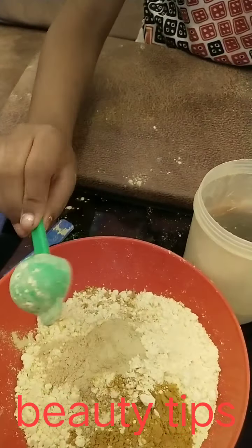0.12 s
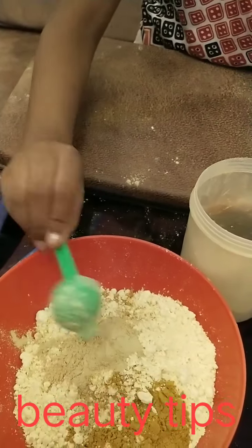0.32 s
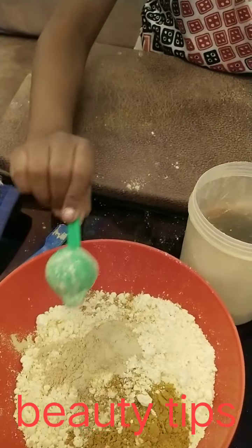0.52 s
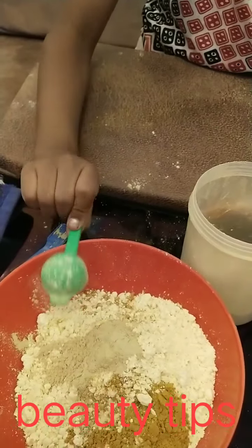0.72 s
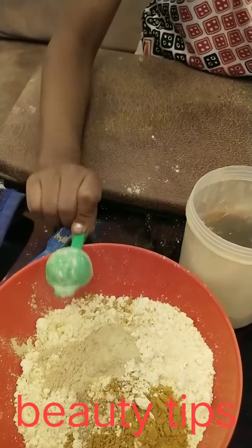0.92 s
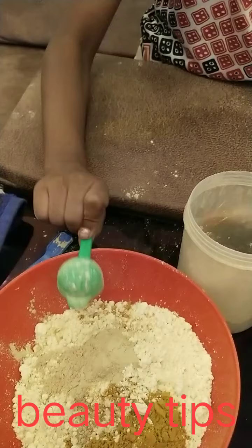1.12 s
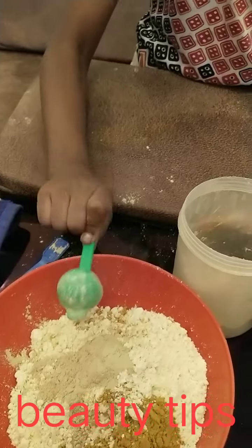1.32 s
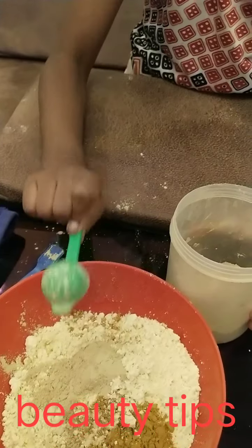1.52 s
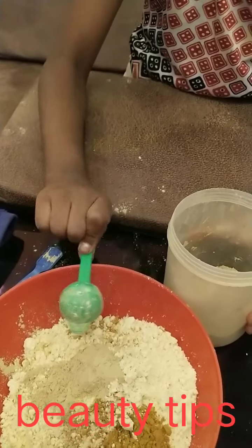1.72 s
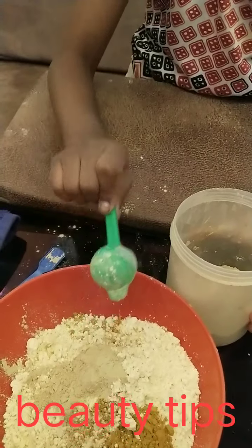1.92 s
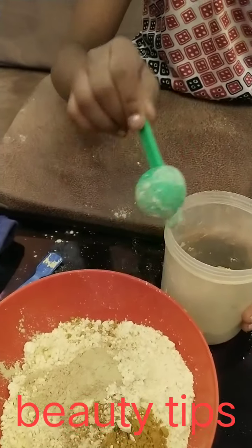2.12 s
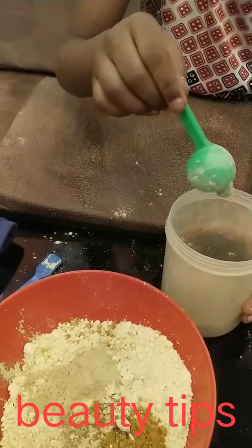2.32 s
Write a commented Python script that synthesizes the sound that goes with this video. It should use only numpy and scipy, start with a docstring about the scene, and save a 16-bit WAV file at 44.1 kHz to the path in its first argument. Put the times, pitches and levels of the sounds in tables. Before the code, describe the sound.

A plastic measuring spoon knocks six times on the rim of a powder-filled plastic bowl, the first two with tiny rebounds, then faint rustling; close stereo microphones in a small room with a quiet fan humming.

```python
"""Spoon taps on a powder bowl

A plastic measuring spoon taps the rim of a plastic bowl of powder six times, some taps rebounding, near two microphones.
Each touch strikes damped modes of spoon and bowl, adds a noise crack, and feeds a table thud to the room.
The room is decaying diffuse noise; a fan of banded noise and motor lines hums behind.
Later come faint rustles of resonant noise and one short ringing tick."""
import sys
import numpy as np
from scipy import signal
from scipy.fft import rfft, irfft
from scipy.io import wavfile

SR = 44100
rng = np.random.default_rng(int(sys.argv[2]) if len(sys.argv) > 2 else 0)


def undo_db(level):
    """Turn decibels back into plain size, where 20 dB means ten times bigger."""
    steps = np.asarray(level, float) / 20
    return 10 ** steps


def file_out(sig):
    """Save sig as 16-bit WAV at sys.argv[1]."""
    # one column per channel
    cols = np.atleast_2d(sig).T
    # limit, then scale
    lim = np.clip(cols, -1, 1)
    pcm = np.round(lim * 32767).astype(np.int16)
    wavfile.write(sys.argv[1], SR, pcm)


N = 105840


def rms_one(x):
    """Scale to rms 1."""
    return x / np.sqrt(np.mean(x ** 2) + 1e-20)


def at_hz(points, hz):
    """Interpolate a table on a log frequency axis."""
    table = np.array(points)
    return np.interp(np.log(hz), np.log(table[:, 0]), table[:, 1])


def band_pass(x, low_hz, high_hz):
    """Second-order Butterworth band."""
    return signal.sosfilt(signal.butter(2, [low_hz, high_hz], "band", fs=SR, output="sos"), x)


def ring(drive, hz, t60_s):
    """Two-pole resonator: a unit click starts a decaying sine of height 1."""
    r = undo_db(-60 / (t60_s * SR))
    w = 2 * np.pi * hz / SR
    return signal.lfilter([0, np.sin(w)], [1, -2 * r * np.cos(w), r * r], drive + 1e-18)


def delayed(x, delay_s):
    """Delay by phase rotation, fractions of a sample included."""
    return irfft(rfft(x) * np.exp(-2j * np.pi * np.fft.rfftfreq(N, 1 / SR) * delay_s), N)


def drift(rate_hz):
    """Slow random curve of rms 1: noise through two equal poles, computed every 40 samples."""
    r = np.exp(-80 * np.pi * rate_hz / SR)
    noise = rng.standard_normal(N // 40 + 2002)
    slow = signal.lfilter([1], [1, -2 * r, r * r], noise)[2000:]  # settled part
    return np.interp(np.arange(N) / 40, np.arange(len(slow)), rms_one(slow))


# left-right correlation of diffuse sound: hz, correlation
LIKENESS = [(60, 0.83), (130, 0.93), (290, 0.91), (640, 0.43), (1410, 0.0), (3100, -0.02), (6820, -0.05),
            (15000, 0.01)]
# left minus right level of diffuse sound: hz, lean_db
LEAN = [(60, 2.5), (110, 2.5), (200, -2), (380, 7.5), (700, -3), (1290, 3), (2380, 1), (4400, 4.5),
        (8120, 2), (15000, 8)]


def diffuse(size, gain_at):
    """Third-octave stereo noise, alike in the bass; gain_at(hz) is each band's gain over time."""
    out = 0
    edges_hz = 24 * 2 ** np.arange(0, 9.5, 1 / 3)
    white = rng.standard_normal((2, 2, size + 4000))
    for k, (low_hz, high_hz) in enumerate(zip(edges_hz, edges_hz[1:])):
        # neighbouring bands use separate noise
        mid, side = band_pass(white[k % 2], low_hz, high_hz)[:, 4000:]
        hz = np.sqrt(low_hz * high_hz)
        alike = np.clip(at_hz(LIKENESS, hz), -1, 1)
        pair = np.sqrt(1 + alike) * mid + np.sqrt(1 - alike) * side * [[1], [-1]]
        lean = undo_db(at_hz(LEAN, hz) / 2 * np.array([[1], [-1]]))
        out = out + gain_at(hz) * pair * lean
    return out


# fan and room air spectrum: hz, relative_density_db
AIR_COLOUR = [(15, -47), (25, -17), (53, 1), (70, -30), (87, -2), (195, 6.5), (293, -2), (317, -12.5),
              (384, 2), (416, -8.5), (503, -6), (754, -12.5), (1610, -15), (14800, -37.5), (16000, -46)]
# air level, two runs of points: time_s, level_db
AIR_LEVEL = [
    [(0.0, -56.5), (0.054, -57.5), (0.072, -55), (0.198, -57.5), (0.21, -60)],
    [(1.45, -56.5), (1.456, -55), (1.904, -55.5), (1.918, -57), (2.4, -55.5)],
]
# fan motor lines: hz, rms_db before the stereo lean
MOTOR_LINES = [(49, -78), (98, -71.5), (196, -68), (293, -65.5), (390, -68), (1563, -85), (1610, -80.5),
               (1657, -81), (1854, -85)]
MOTOR_T60_S = 2.44 / 6.5


def fan():
    """Broad air noise that flickers a little, plus motor lines wavering as noise-driven resonances."""
    time_s, level_db = np.transpose(sum(AIR_LEVEL, []))
    together = drift(18.0)

    def gain(hz):
        """Band gain: shared plus independent flicker in dB."""
        return undo_db(at_hz(AIR_COLOUR, hz) + 0.68 * together + 0.41 * drift(17.0))

    air = undo_db(np.interp(np.arange(N) / SR, time_s, level_db)) * rms_one(diffuse(N, gain))
    lines = np.zeros(N)
    for hz, rms_db in MOTOR_LINES:
        lines += undo_db(rms_db) * rms_one(ring(rng.standard_normal(N), hz, MOTOR_T60_S))
    return air + lines * undo_db(np.array([[1.5], [-1.5]]))


# spoon touches on the rim, rebounds included: start_s
TOUCH_S = [.2330, .2404, .4525, .4573, .6940, .9026, 1.1449, 1.2719]


def touch_clicks(level_db):
    """One single-sample click per touch."""
    clicks = np.zeros(N)
    clicks[np.round(np.array(TOUCH_S) * SR).astype(int)] = undo_db(level_db)
    return clicks


# each touch: strength_db, bright_db, ring_db (first BOWL mode), thud_db, crack_db
TOUCHES = [(-5, 2.5, 9, 3.5, 6.5), (-17.5, 8, 15, -12, 2), (-9.5, 0.5, -34, 3.5, 4.5),
           (-16.5, 2, 15.5, 0, 7), (-8.5, 0, 3, 6, 2), (-8, 0.5, 3.5, 6, 1.5), (-10, 2.5, -3.5, 3.5, 4),
           (-14.5, 0.5, 1, 7.5, 1.5)]
# quickly damped spoon and bowl modes: hz, signed_height_left, signed_height_right, t60_s
KNOCK = [(187, -.27, .05, .021), (345, -.11, -.1, .06), (684, -.86, -.39, .014), (752, .66, .39, .0195),
         (958, -.65, -.13, .018), (997, .79, .66, .0186), (1159, -.38, -1.69, .0071),
         (1436, -.36, 1.39, .0042), (1980, -.13, .11, .0085), (2441, .07, -.02, .0127),
         (3393, .63, 0, .0186), (4267, -.03, -.16, .011), (5534, .26, -.03, .0032),
         (6023, -.14, -.01, .006)]
# thin overtones and longer rings: hz, signed_height_left, signed_height_right, t60_s
BOWL = [(713.7, -0.048, -0.035, 0.068), (970, 0.0097, -0.015, 0.13), (1082, 0.052, 0.016, 0.17),
        (1400, 0.071, -0.025, 0.11), (4920, 0.072, -0.024, 0.026), (6570, 0.022, 0.076, 0.021),
        (9100, -0.18, -0.056, .006)]
MODE_SCATTER_DB, BRIGHT_FROM_HZ, CONTACT_SAMPLES = 0.6, 3000, 5


def knocks():
    """Each touch strikes all modes through a short soft contact, slightly differently."""
    strength_db, bright_db, ring_db, _, _ = np.transpose(TOUCHES)
    out = np.zeros((2, N))
    chance = rng.standard_normal((len(TOUCH_S), len(KNOCK + BOWL)))
    for k, (hz, left, right, t60_s) in enumerate(KNOCK + BOWL):
        first_bowl_mode = k == len(KNOCK)
        extra_db = bright_db if hz > BRIGHT_FROM_HZ else ring_db * first_bowl_mode
        clicks = touch_clicks(strength_db + extra_db + MODE_SCATTER_DB * chance[:, k])
        out += np.array([[left], [right]]) * ring(clicks, hz, t60_s)
    contact = np.hanning(CONTACT_SAMPLES + 2)
    return signal.lfilter(contact / contact.sum(), 1, out)


LEFT_LAG_S = 0.000124
BACK_WAVE_S, BACK_WAVE_GAIN = 0.000294, -0.968


def arrive(knock):
    """The right microphone hears first; the left adds the inverted wave from the bowl wall's far side."""
    left, right = knock
    left = left + BACK_WAVE_GAIN * delayed(left, BACK_WAVE_S)
    return np.array([delayed(left, LEFT_LAG_S), right])


CRACK_DB, CRACK_LEAN_DB, CRACK_T60_S = -20, 15, 0.011
CRACK_LOW_HZ, CRACK_HIGH_HZ = 5100, 11570


def cracks():
    """Splintery noise of hard contact: a brief bright burst per touch, stronger on the left."""
    strength_db, *_, crack_db = np.transpose(TOUCHES)
    clicks = touch_clicks(strength_db + crack_db + CRACK_DB)
    envelope = signal.lfilter([1], [1, -undo_db(-60 / (CRACK_T60_S * SR))], clicks + 1e-18)
    burst = envelope * rng.standard_normal((2, N))
    high_pass = signal.butter(2, CRACK_LOW_HZ, "high", fs=SR, output="sos")
    low_pass = signal.butter(4, CRACK_HIGH_HZ, fs=SR, output="sos")
    bright = signal.sosfilt(np.vstack([high_pass, low_pass]), burst)
    return bright * undo_db(np.array([[0], [-CRACK_LEAN_DB]]))


SPREAD_LOW_HZ, SPREAD_HIGH_HZ = 565, 3030
SPREAD_CLICK_DB, SPREAD_RING_DB = 3, -5


def spread(direct):
    """Averaged over all directions the treble is a smooth click; the body keeps its rings."""
    strength_db, *_, crack_db = np.transpose(TOUCHES)
    clicks = touch_clicks(strength_db + crack_db + SPREAD_CLICK_DB)
    body = band_pass(direct, SPREAD_LOW_HZ, SPREAD_HIGH_HZ)
    high_pass = signal.butter(2, SPREAD_HIGH_HZ, "high", fs=SR, output="sos")
    return body + signal.sosfilt(high_pass, clicks + undo_db(SPREAD_RING_DB) * direct)


THUD_GAIN = 20 * undo_db(-4)
THUD_LOW_HZ, THUD_HIGH_HZ = 116, 322


def thud():
    """Table thud: each touch as a low band-passed click."""
    strength_db, _, _, thud_db, _ = np.transpose(TOUCHES)
    clicks = touch_clicks(strength_db + thud_db)
    return THUD_GAIN * band_pass(clicks + 1e-18, THUD_LOW_HZ, THUD_HIGH_HZ)


# reflection spectrum: hz, relative_level_db
ROOM_COLOUR = [(60, 0), (130, -5.5), (210, -2), (300, -5), (460, -7), (670, -3.5), (850, -0.5), (1050, -9),
               (1450, -2), (1900, -12), (3000, -4), (4500, -3.5), (6100, -6), (8000, -15), (10000, -15),
               (13000, -32), (15500, -29)]
# late tail decay: hz, t60_s
ROOM_T60 = [(100, 0.88), (300, 0.5), (800, 0.52), (2000, 0.49), (5000, 0.49), (12000, 0.39)]
ROOM_DB, ROOM_DELAY_S, ROOM_RISE_S = -38, 0.0041, 0.0066
EARLY_DB, EARLY_T60_S = 19, 0.041  # near surfaces, relative to the late tail
EARLY_BASS_LOSS_DB, EARLY_BASS_HZ = 7.5, 420
WALL_S, WALL_SMEAR_S, WALL_DB = 0.019, 0.001, -0.5  # cluster from a nearer wall
SPOT_CHANGE = 0.6  # reflections vary with where the spoon lands


def room(x):
    """Dense reflections: quick early decay over a banded tail; each touch blends three patterns its own way."""
    t = np.arange(SR * 3 // 4) / SR
    rise = np.clip((t - ROOM_DELAY_S) / ROOM_RISE_S, 0, 1)
    wall = undo_db(WALL_DB) * np.exp(-0.5 * ((t - WALL_S) / WALL_SMEAR_S) ** 2)
    early = undo_db(EARLY_DB - 60 * t / EARLY_T60_S) + wall

    def gain(hz):
        """Band gain over time."""
        near = early * undo_db(-EARLY_BASS_LOSS_DB * (hz < EARLY_BASS_HZ))
        tail = undo_db(-60 * t / at_hz(ROOM_T60, hz))
        return undo_db(at_hz(ROOM_COLOUR, hz)) * (near + tail)

    touch = np.searchsorted(TOUCH_S, (np.arange(N) + 1) / SR, side="right")
    turn = 2 * np.pi * rng.random(len(TOUCH_S) + 1)[touch]
    blend = [np.sqrt(1 - SPOT_CHANGE ** 2), SPOT_CHANGE * np.cos(turn), SPOT_CHANGE * np.sin(turn)]
    out = np.zeros((2, N))
    for share in blend:
        pattern = diffuse(len(t), gain) * rise
        out += signal.fftconvolve((x * share)[None], pattern, axes=1)[:, :N]
    return undo_db(ROOM_DB) * out


# cloth and powder: centre_s, sigma_s, level_db, resonance_hz
RUSTLES = [(1.54, 0.029, -65, 2320), (1.547, 0.023, -71, 6100), (2.096, 0.05, -70, 2215),
           (2.2, 0.094, -69.5, 1083)]


def rustles():
    """Faint Gaussian swells of noise around a broad resonance, independent per channel."""
    t = np.arange(N) / SR
    out = np.zeros((2, N))
    for centre_s, sigma_s, level_db, hz in RUSTLES:
        noise = rms_one(ring(rng.standard_normal((2, N)), hz, 10.8 / hz))
        out += undo_db(level_db) * noise * np.exp(-0.5 * ((t - centre_s) / sigma_s) ** 2)
    return out


TICK_S, TICK_DB, TICK_HZ, TICK_T60_S = 2.06, -66, 10500, 0.011


def tick():
    """One grain of grit: a click rings a single high mode."""
    click = undo_db(TICK_DB) * (np.arange(N) == int(TICK_S * SR))
    return ring(click, TICK_HZ, TICK_T60_S)


def scene():
    """Direct taps, their room, and the background."""
    direct = arrive(knocks()) + cracks()
    reflections = room(spread(direct.mean(axis=0)) + thud())
    return direct + reflections + fan() + rustles() + tick()


def top_cut(x):
    """Nothing passes above the cut-off."""
    return signal.sosfilt(signal.butter(12, 16400, fs=SR, output="sos"), x)


MIC_LOW_HZ, MIC_HIGH_HZ = 65, 15300


def record(dry):
    """The microphones lose the deepest bass and the top."""
    high_pass = signal.butter(2, MIC_LOW_HZ, "high", fs=SR, output="sos")
    low_pass = signal.butter(8, MIC_HIGH_HZ, fs=SR, output="sos")
    mix = signal.sosfilt(np.vstack([high_pass, low_pass]), dry)
    return top_cut(mix)


dry = scene()
out = record(dry)
file_out(out)
```